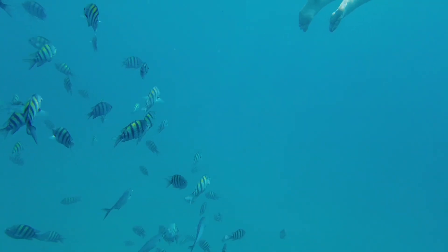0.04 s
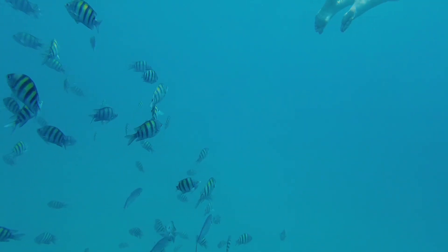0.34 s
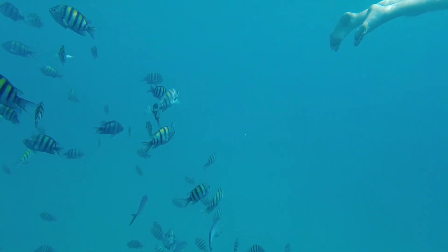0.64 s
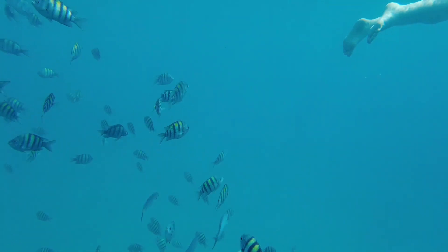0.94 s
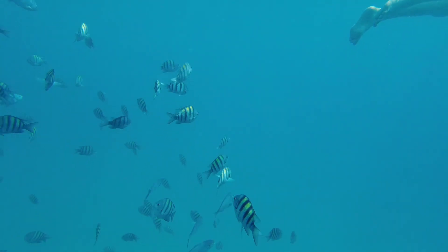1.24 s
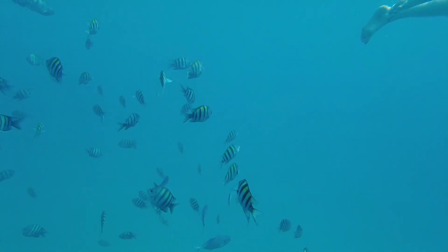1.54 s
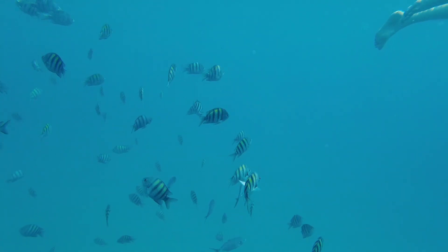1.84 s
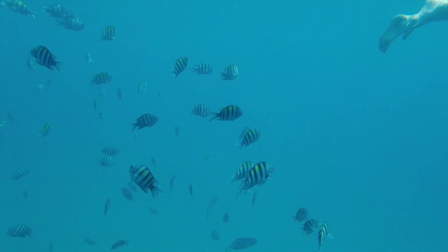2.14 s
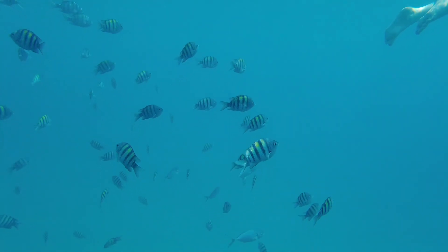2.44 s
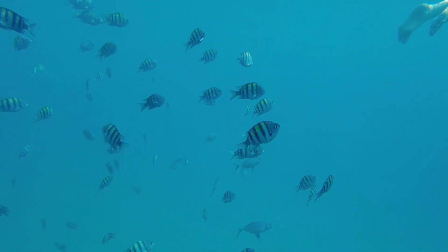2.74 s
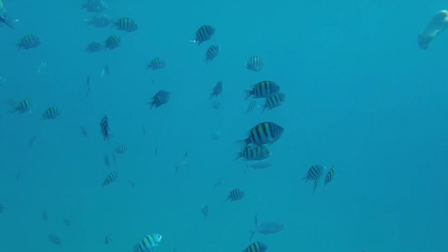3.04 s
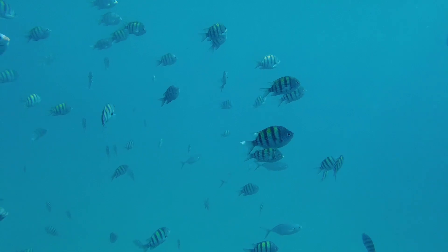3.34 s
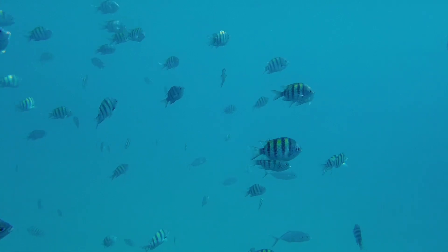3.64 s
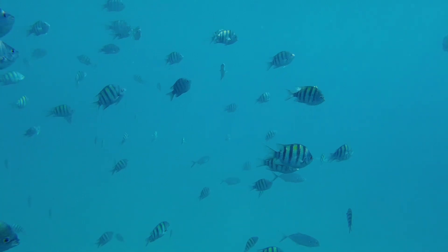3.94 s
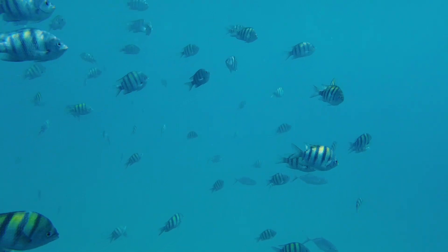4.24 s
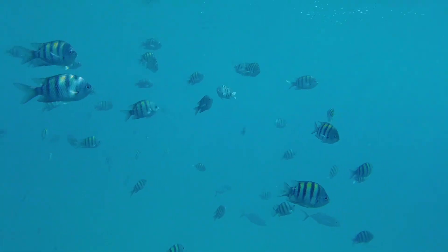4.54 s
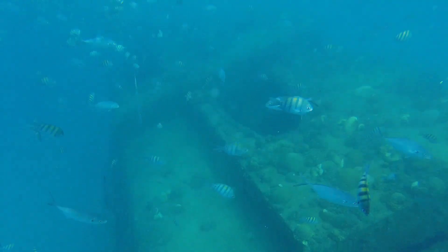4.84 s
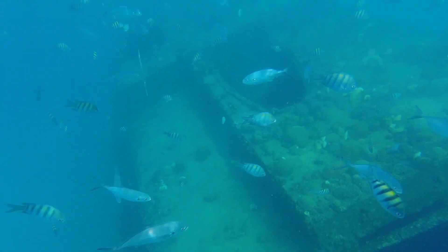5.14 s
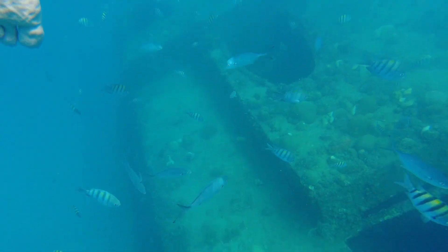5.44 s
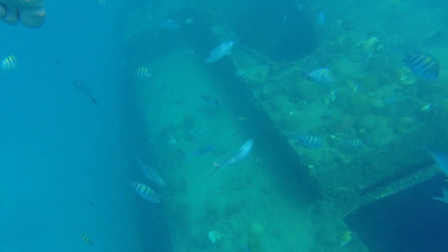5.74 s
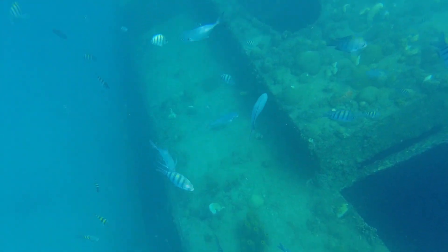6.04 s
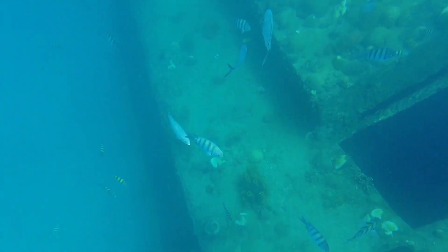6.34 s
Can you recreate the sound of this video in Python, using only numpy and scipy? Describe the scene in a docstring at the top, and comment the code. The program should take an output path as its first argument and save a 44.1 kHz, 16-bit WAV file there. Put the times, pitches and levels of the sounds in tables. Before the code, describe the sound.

From the start, snapping shrimp crackle faintly all around an underwater microphone, near ones as single ticks with a slight ring from the waterproof case, far ones as a frying hiss. Beneath them, water surges in a soft, fluttering rumble and swishes briefly against the case. From about 1.1 seconds come light, dull bumps and a cluster of small bubble blips, with more bubbles between 3.2 and 4 seconds. At 3.5 seconds a hard, muffled thump hits the case, by far the loudest sound, followed by a softer one at 3.8. A few light taps come between 4.4 and 4.7 seconds, and the sound drops out for an instant at 4.8. Then, over a wreck, the hiss is duller, thin dry ticks stand out and higher bubbles blip. The crackle carries on, with a last soft surge of water, until about 6.6 seconds.

```python
"""Drifting over a reef, heard through a ringing waterproof case. From the start snapping shrimp crackle
all around, near ones as single ticks, far ones as a hiss, while water surges and scrapes past. Bubbles
blip and the case takes light bumps from 1.1 s; a hard thump lands at 3.5 s, a softer one at 3.8 s.
After a few taps the sound drops out for an instant at 4.8 s. Then, over a wreck, the hiss loses
treble, thin dry ticks stand out and higher bubbles blip."""
import sys
import numpy as np
from scipy import signal
from scipy.fft import rfft, irfft
from scipy.io import wavfile
from scipy.ndimage import uniform_filter1d

SR = 44100
rng = np.random.default_rng(int(sys.argv[2]) if len(sys.argv) > 2 else 0)


def transcribe(signal):
    """Save signal, clipped to [-1, 1], as a 16-bit WAV file at the path in sys.argv[1]."""
    frames = np.atleast_2d(signal).T
    limited = np.clip(frames, -1, 1)
    pcm = np.round(limited * 32767).astype(np.int16)
    wavfile.write(sys.argv[1], SR, pcm)


N = 290619
TIME = np.arange(N) / SR
SPREAD = np.array([[1], [-1]])  # adds on the left, subtracts on the right

# Foreground shrimp snaps, before trim and pan: start_s, ring_db, treble_db, ring_centre_hz
NEAR_SNAPS = [(0.119, -46.5, -53.5, 3040), (0.1509, -51, -50.5, 2990.0), (0.2204, -47, -47, 2930.0),
              (0.4422, -44.5, -51, 3000), (0.455, -61, -59, 2840.0), (0.4654, -53, -55.0, 3000.0),
              (0.5049, -54, -52.0, 3000.0), (0.5228, -53, -55, 3030.0), (0.6094, -50.5, -51.5, 2940),
              (0.7431, -48, -55.5, 2980), (0.7491, -48, -49, 2940), (0.795, -61.5, -52, 2850.0),
              (0.8873, -46.5, -51, 3030), (0.9185, -47, -47.5, 2980), (0.9575, -50.5, -52, 2880),
              (0.983, -61, -52, 3020.0), (1.0136, -55.5, -58, 3160), (1.041, -55, -50, 3100),
              (1.1544, -59, -49.5, 2960), (1.3114, -55.5, -50.5, 3010.0), (1.332, -55.5, -55, 3120.0),
              (1.442, -54, -47.5, 2980.0), (1.455, -62, -54, 2900.0), (1.517, -44.0, -46, 3170),
              (1.5438, -50.5, -56.5, 3100), (1.6326, -44, -52.5, 3280), (1.7431, -54.5, -62, 2700),
              (1.8088, -56, -54, 2940.0), (1.8227, -48.5, -52, 3000), (1.886, -48, -58, 3030),
              (1.9898, -48.5, -48, 3130), (2.049, -50, -56, 2950.0), (2.076, -47.0, -58, 3040),
              (2.0819, -37.5, -41, 3000), (2.0888, -57, -73, 3000), (2.118, -53.5, -61, 2750),
              (2.1922, -56.0, -51.5, 3180), (2.207, -54.5, -53, 3140.0), (2.22, -53, -57, 3120.0),
              (2.253, -48.5, -48, 3140), (2.2823, -51, -57, 3000), (2.337, -35.5, -48, 2770),
              (2.4734, -50.5, -56.5, 2900.0), (2.6989, -50, -51, 3200), (2.722, -45.5, -49.5, 3000),
              (2.7536, -55, -50.0, 2900), (2.7579, -46, -51, 3260), (2.771, -52, -55, 3130),
              (2.8414, -52.5, -52.5, 2660), (2.886, -62.5, -55.5, 3010.0), (2.9085, -49, -49.5, 3160),
              (2.9986, -40.5, -37.5, 2950.0), (3.0094, -40.5, -51, 3070), (3.0137, -55, -64, 3070),
              (3.0399, -48.5, -51, 3150), (3.0853, -46, -43.5, 3080.0), (3.0896, -52, -43.5, 3130.0),
              (3.204, -70.0, -57, 2990.0), (3.2266, -52, -48, 3080.0), (3.2358, -50, -53.5, 3070),
              (3.2626, -46.5, -52.5, 3130), (3.5518, -54, -52, 3040), (3.583, -56, -55, 3030.0),
              (3.654, -43.5, -49, 3160.0), (3.7, -43.5, -60.0, 2740), (3.781, -58, -50, 2780.0),
              (3.8383, -58, -51, 3080), (3.8476, -44.5, -50, 2700), (3.8862, -51, -54, 3070.0),
              (3.9307, -52, -63, 3120), (3.9367, -48.5, -71, 3230), (4.2043, -48.5, -53, 2950),
              (4.237, -51, -50, 3140.0), (4.2514, -67.0, -49, 2700), (4.349, -55, -47.5, 2910.0),
              (4.357, -53, -55, 2860), (4.4948, -49, -54, 2560), (4.5207, -43.5, -46, 2780),
              (4.544, -51.5, -50, 2900.0), (4.5545, -53, -54, 3060), (4.6282, -68.0, -49.5, 3000.0),
              (4.641, -60, -47.5, 3040.0), (4.6795, -63, -52.5, 2920.0), (4.7137, -44.0, -59.5, 2920),
              (5.048, -41.5, -78, 3030.0), (5.0578, -48, -76, 2800), (5.1476, -50, -60.5, 2930),
              (5.4568, -51, -74.5, 2940), (5.4974, -45.5, -58, 3100.0), (5.5148, -51.0, -57, 2780),
              (5.7956, -51.5, -59, 2940.0), (5.8387, -47.0, -62, 2780), (5.9021, -42.5, -67, 2760),
              (6.0522, -46.5, -63.5, 2980), (6.0835, -53.5, -71.5, 2740), (6.3067, -56.5, -61, 2870)]
# Fader ride for the case ring of the middle and far shrimp: time_s, relative_db
RING_RIDE = [(0, -62.5), (1.0, -64), (2.15, -62.5), (2.52, -66), (3.3, -64), (3.72, -60), (4.24, -68),
             (4.9, -63), (5.35, -66.5), (5.85, -64.5), (6.25, -70), (6.59, -68)]
# Fader ride for their treble, weaker over the wreck: time_s, relative_db
TREBLE_RIDE = [(0, -66), (.9, -64), (1.25, -66), (2.5, -65.5), (3.6, -63.5), (4.15, -65), (4.55, -64.5),
               (4.9, -69), (5.3, -76.5), (5.83, -65), (6.0, -70), (6.59, -71)]
# Thin dry ticks close to the case over the wreck: start_s, peak_db
WRECK_TICKS = [(4.889, -57), (4.902, -43), (5.103, -42), (5.357, -47), (5.519, -55), (5.687, -43),
               (5.781, -47), (5.831, -39), (5.8675, -36), (5.957, -61), (6.156, -49), (6.238, -47),
               (6.325, -55), (6.505, -50)]
# Hits on the case: time_s, push_db, contact_half_width_s, sign (+ presses, - pulls)
CASE_BUMPS = [(1.11, -42, 0.0095, -1), (1.309, -39.5, 0.0072, 1), (2.266, -49, 0.0026, 1),
              (3.511, -7, 0.0012, 1), (3.614, -32.5, 0.0016, -1), (3.786, -19.5, 0.0019, -1),
              (4.411, -37, 0.0031, -1), (4.579, -35.5, 0.00056, 1), (4.597, -36, 0.00031, 1),
              (4.713, -40.5, 0.000069, -1)]
# Close bubble blips: start_s, pitch_hz, peak_db, decay_cycles (to fall by 60 dB)
NEAR_BUBBLES = [(1.158, 624, -57, 24), (1.188, 635, -46.5, 37), (1.228, 550, -53, 55),
                (1.255, 630, -53.5, 18), (1.443, 657, -53.5, 26), (1.465, 1970, -56, 50),
                (1.539, 656, -40, 44), (3.243, 616, -45.5, 57), (3.337, 706, -55, 79),
                (3.472, 750, -54.5, 60), (3.512, 697, -45.5, 29), (3.694, 608, -42, 24),
                (3.719, 554, -46, 20), (3.936, 908, -48.5, 60), (4.056, 640, -55.5, 49),
                (4.984, 529, -56, 38), (5.027, 1580, -52.5, 31), (5.089, 1480, -53, 93),
                (5.404, 1504, -52, 55), (5.405, 2410, -49, 110), (5.408, 928, -52, 83),
                (5.429, 904, -51.5, 85), (5.434, 626, -54, 17), (5.529, 2005, -45, 52),
                (5.796, 1940, -54, 110), (6.009, 1326, -54.5, 50), (6.082, 1604, -58, 89)]
# Clouds of faint bubbles: start_s, length_s, level_db
BUBBLE_CLOUDS = [(1.2, 0.72, -69.5), (2.27, 0.27, -62.5), (3.62, 0.18, -64)]
# Water swishing along the case: start_s, length_s, level_db, low_hz, high_hz
WATER_SCRAPES = [(0.066, 0.11, -66.5, 112, 770), (0.88, 0.31, -72, 161, 288),
                 (1.318, 0.031, -60.5, 1370, 2550), (1.652, 0.064, -61, 167, 1010),
                 (1.666, 0.036, -55.5, 1300, 2800), (1.693, 0.006, -47.5, 304, 3050),
                 (3.462, 0.077, -60.5, 1390, 4480), (3.504, 0.035, -51, 245, 816),
                 (3.533, 0.35, -63.5, 110, 790), (3.847, 0.021, -56.5, 260, 1450),
                 (3.844, 0.0072, -45, 1840, 2860), (4.572, 0.027, -54, 248, 1650),
                 (5.384, 0.077, -60.5, 570, 2960), (5.437, 0.16, -64, 850, 3120),
                 (5.495, 0.018, -57.5, 3300, 6500)]
# Surges of water past the case, before flutter: start_s, length_s, level_db
WATER_SURGES = [(.47, 0.17, -56.5), (.83, 0.5, -56.5), (1.66, 0.16, -64), (2.24, 0.04, -56.5),
                (2.68, 0.54, -60.5), (3.28, 0.59, -54.5), (4.41, 0.15, -50), (4.54, 0.23, -56.5),
                (6.27, 0.28, -57)]
# Tone of the case walls moving together, alike in both channels: frequency_hz, gain_db
CASE_MID_EQ = [(500, -20.5), (1200, -26), (1500, 1), (1780, -11.5), (2000, -8), (2500, 0.5), (2930, 6),
               (3060, 6), (3250, 7), (3600, -17.5), (5350, -1.5), (7000, -11.5), (9300, -9), (10800, -23.5),
               (14600, -10), (16000, -44)]
# Tone of the case walls rocking, opposite in the two channels: frequency_hz, gain_db
CASE_SIDE_EQ = [(300, -24), (1000, -29), (2000, -17), (2850, -18.5), (3150, -2.5), (3500, -14),
                (4500, -4.5), (5400, -16), (6300, 0), (7000, -25), (7500, -4), (8000, -17), (8900, -13),
                (10400, -22), (11100, -10), (12000, -35), (14000, -10.5), (16000, -33)]
# Tone of the water wash, alike in both channels: frequency_hz, gain_db
WASH_MID_EQ = [(30, 6.5), (100, -11.5), (145, 3.5), (175, -9.5), (265, 0.5), (350, -7), (650, -10),
               (800, -12.5), (930, -10.5), (1030, -16), (1250, -14), (1500, -4), (1760, -15), (1990, -5),
               (2200, -11.5), (2700, -10), (3700, -13.5), (5400, -17), (11000, -24.5), (15000, -23.5)]
# Tone of the water wash, opposite in the two channels: frequency_hz, gain_db
WASH_SIDE_EQ = [(30, -35), (110, -34), (145, -13), (280, -17.5), (420, -7.5), (750, -12.5), (940, -4),
                (1100, -9), (1400, -4), (1950, -14), (2150, -12), (2320, -2.5), (2500, -8), (3800, -12),
                (6000, -15.5), (15000, -28)]


def snap(tail_db, paths=10, paths_s=.0021, path_db=-2.0, side_db=-1, tail_s=0.011, size=2048):
    """A shrimp's cavity collapses: a spike, echoes around the case, a tail off surface and seabed."""
    pressure = undb(tail_db) * rng.standard_normal((2, size)) * np.exp(-np.arange(size) / SR / tail_s)
    pressure[:, 0] += 1
    for late, mid, side in rng.random((paths, 3)):
        echo = undb(path_db) * (1 - late / 2) * (2 * np.array([mid, side]) - 1)
        pressure[:, int(late * paths_s * SR)] += echo
    return through_case(pressure[0], rng.choice([-1, 1]) * undb(side_db) * pressure[1], scatter_db=4.5)


def near_shrimp(tail_db=-25, dry_above_db=-48, treble_trim_db=0.5, left_db=1, pan_spread_db=6.0):
    """Single snaps from random directions; the nearest stand clear of their tails."""
    out = np.zeros((2, N))
    attack = int(.005 * SR)  # the first 5 ms set a snap's level
    for (start, ring_db, treble_db, hz), place in zip(NEAR_SNAPS, rng.standard_normal(len(NEAR_SNAPS))):
        nearness_db = max(ring_db - dry_above_db, treble_db - dry_above_db, 0)
        ring, treble = ring_and_treble(snap(tail_db - nearness_db / 2))
        ring = focus_ring(ring, hz)
        treble = band(treble, 11000, "low", order=1)
        ring = undb(ring_db) * ring / rms(ring[:, :attack])
        treble = undb(treble_db + treble_trim_db) * treble / rms(treble[:, :attack])
        pan = undb(SPREAD * (left_db + pan_spread_db * place) / 2)
        add(out, (ring + treble) * pan, start + .0005)
    return out


def middle_shrimp(ring_db, treble_db, count=440, ring_trim_db=9.0, treble_trim_db=15, range_db=4.5,
                  tilt_spread_db=7, pan_spread_db=3.5, ring_hz=2980, ring_spread_hz=420):
    """Snaps from a middle distance poke out of the hiss, most of them weak, each in its own colour."""
    stems = np.zeros((2, 2, N))  # ring and treble, each in stereo
    for slot, (late, near, bright, place, pitch) in enumerate(rng.random((count, 5))):
        ring, treble = ring_and_treble(snap(tail_db=-22))
        ring = focus_ring(ring, ring_hz + ring_spread_hz * (2 * pitch - 1))
        tilt_db = tilt_spread_db * (2 * bright - 1)
        ring = ring / np.abs(ring).max() * undb(-tilt_db / 2)
        treble = treble / np.abs(treble).max() * undb(tilt_db / 2)
        channel_db = range_db * near ** 2 + pan_spread_db * (2 * place - 1) * SPREAD
        start = (slot + 10 * late) % count / count * N / SR  # an even grid, loosened by up to ten slots
        add(stems, np.array([ring, treble]) * undb(channel_db), start)
    return stems[0] * undb(ring_db + ring_trim_db) + stems[1] * undb(treble_db + treble_trim_db)


def far_shrimp(ring_db, treble_db, per_s=2500, scatter_db=5.5, largest_db=18,
               ring_trim_db=-2.0, treble_trim_db=-4.5, smear_s=0.0024):
    """Countless small snaps, each smeared over several paths, merge into a frying hiss."""
    sizes = undb(np.minimum(scatter_db * rng.exponential(size=N), largest_db))
    power = (rng.random(N) < per_s / SR) * sizes ** 2
    smear = np.exp(-1 / (smear_s * SR))
    envelope = np.sqrt(signal.lfilter([1], [1, -smear], power))
    ring, treble = ring_and_treble(through_case(*(envelope * rng.standard_normal((2, N)))))
    return (ring / rms(ring.mean(0)) * undb(ring_db + ring_trim_db)
            + treble / rms(treble.mean(0)) * undb(treble_db + treble_trim_db))


def ticks(count=280, faint_db=-56, scatter_db=3, decay_s=0.00048, low_hz=4800, width=0.47, size=512):
    """Faint dry ticks prickle on the case throughout; over the wreck a few stand out."""
    out, t = np.zeros((2, N)), np.arange(size) / SR
    faint = [(when * N / SR, faint_db + scatter_db * (2 * loud - 1))
             for when, loud in rng.random((count, 2))]
    for start, db in list(WRECK_TICKS) + faint:
        mid, side = band(rng.standard_normal((2, size)) * np.exp(-t / decay_s), low_hz, "high")
        add(out, undb(db) * (mid + width * SPREAD * side) / np.abs(mid).max(), start)
    return out


def bumps(rebound=0.33, rebound_s=0.0118, widen=2.9, body_hz=150, body_db=-30, body_t60_s=0.26,
          pan_db=-1, muffle=0.49, size=16384):
    """A push squeezes the case, which springs back more slowly and hums; longer contact is duller."""
    out, t = np.zeros(N), (np.arange(size) - size // 2) / SR
    after = np.maximum(t, 0)
    hum = undb(body_db) * np.sin(2 * np.pi * body_hz * after) * np.exp(-np.log(1000) * after / body_t60_s)
    for when, db, contact_s, sign in CASE_BUMPS:
        push = 1 / (1 + (t / contact_s) ** 2)
        release = rebound / (1 + ((t - rebound_s) / (widen * contact_s)) ** 2)
        thump = band(push - release + hum, min(muffle / contact_s, SR / 2.5), "low")
        add(out, sign * undb(db) * thump, when + t[0])
    return out * undb(SPREAD * pan_db / 2)


def bubble(hz, t60_s, wobble, rise=0.063, onset_cycles=8.2, size=8192):
    """A bubble rings at its own pitch, which creeps up as it rises; its shape wobbles."""
    t = np.arange(size) / SR
    shake = band(rng.standard_normal((2, size)), 73, "low")
    tremolo, bend = wobble * shake / rms(shake)
    phase = 2 * np.pi * hz * (t + rise * t ** 2 / (2 * t60_s)) + bend
    onset = 1 - np.exp(-(t * hz / onset_cycles) ** 2)
    return onset * np.exp(-np.log(1000) * t / t60_s) * (1 + tremolo) * np.sin(phase)


def near_bubbles(lean_left=0.14, wobble=0.39):
    """Single bubbles blip close to the case."""
    out = np.zeros((2, N))
    for start, hz, db, cycles in NEAR_BUBBLES:
        blip = bubble(hz, cycles / hz, wobble)
        add(out, undb(db) * blip / np.abs(blip).max() * (1 + lean_left * SPREAD), start)
    return out


def bubble_clouds(count=480, centre_hz=610, octaves=.3, t60_s=0.11, scatter_db=2.5, width=0.53):
    """Faint bubbles further off, of mixed sizes and from all sides, blur into passing burbles."""
    out = np.zeros((2, N))
    for start, (pitch, loud, place) in zip(rng.random(count) * N / SR, rng.standard_normal((count, 3))):
        blip = bubble(centre_hz * 2 ** (octaves * pitch), t60_s, wobble=0.21)
        add(out, undb(scatter_db * loud) * blip * (1 + width * place * SPREAD), start)
    return out / rms(out) * swells(BUBBLE_CLOUDS, rest_db=-74, attack_s=0.025, release_s=0.26)


def scrapes(grain_db=2, width=0.54):
    """Water rubs the case in short, grainy swishes, coloured by its low resonances."""
    out = np.zeros((2, N))
    grain = rng.standard_normal((2, N)) * undb(grain_db * wander(rate_hz=140))
    rub = np.array([colour(channel, WASH_MID_EQ) for channel in grain])
    for start, length_s, db, low_hz, high_hz in WATER_SCRAPES:
        i, n = int(start * SR), int(length_s * SR)
        mid, side = band(rub, [low_hz, high_hz], "band", order=3)[:, i:i + n] * signal.windows.tukey(n)
        add(out, undb(db) * (mid + width * SPREAD * side) / rms(mid), start)
    return out


def slosh(corner_hz=36, flutter_db=5.0, eddy_db=-14, eddy_hz=110, width=0.057, stir_db=-30, stir_s=0.067):
    """Water pushing past, in surges and around each bump, makes a fluttering sub rumble with eddies."""
    mid, side = band(band(rng.standard_normal((2, N)), corner_hz, "low", order=4), 16, "high")
    mid = mid / np.sqrt(uniform_filter1d(mid ** 2, size=4096))  # levelled, so the surges give the shape
    eddies = band(rng.standard_normal(N), eddy_hz, "low")
    rumble = mid + undb(eddy_db) * eddies / rms(eddies) + width * SPREAD * side / rms(side)
    surges = swells(WATER_SURGES, rest_db=-65.5, attack_s=0.012, release_s=0.032)
    stir = sum(undb(db + stir_db) * np.exp(-np.abs(TIME - when) / stir_s)
               for when, db, _, _ in CASE_BUMPS)
    return rumble * (surges + stir) * undb(flutter_db * wander(rate_hz=24.98))


def wash(level_db=-63.5):
    """The dull bed of open water, coloured by the low resonances of the case."""
    mid, side = (colour(rng.standard_normal(N), eq) * undb(wander(rate_hz=22.27))
                 for eq in (WASH_MID_EQ, WASH_SIDE_EQ))
    return undb(level_db) * (mid + SPREAD * side) / rms(mid)


def through_case(mid, side, scatter_db=0):
    """Two families of wall resonances make the stereo; the angle of arrival favours some over others."""
    mid_eq, side_eq = (eq + scatter_db * rng.standard_normal((len(eq), 1)) * [0, 1]  # gains only
                       for eq in (CASE_MID_EQ, CASE_SIDE_EQ))
    return colour(mid, mid_eq) + SPREAD * colour(side, side_eq)


def ring_and_treble(x, split_hz=3900):
    """Split the main ring of the case from the tick above it."""
    return band(x, split_hz, "low", order=6), band(x, split_hz, "high", order=6)


def focus_ring(ring, hz, span=1.08, rest_db=-11):
    """Each direction of arrival brings out another part of the ring."""
    return band(ring, [hz / span, hz * span], "band", order=1) + undb(rest_db) * ring


def colour(x, eq, size=4096):
    """Minimum-phase EQ: its peaks ring on after each click."""
    hz, db = np.transpose(eq)
    log_gain = np.log(undb(np.interp(np.log(np.fft.rfftfreq(size, 1 / SR) + 1), np.log(hz), db)))
    cepstrum = irfft(log_gain)[:size // 2]
    cepstrum[1:] *= 2
    impulse = irfft(np.exp(rfft(cepstrum, size)))[:size // 2]
    return signal.fftconvolve(x, impulse)[:len(x)]


def swells(table, rest_db, attack_s, release_s):
    """Gain envelope: each row rises, holds and dies away above a resting level."""
    power = undb(rest_db) ** 2
    for start, length_s, db in table:
        fade = np.maximum(start - TIME, 0) / attack_s + np.maximum(TIME - start - length_s, 0) / release_s
        power = power + (undb(db) * np.exp(-fade)) ** 2
    return np.sqrt(power)


def wander(rate_hz):
    """Smoothed random sample-and-hold with an rms of 1."""
    hold = int(SR / rate_hz)
    steps = np.repeat(rng.standard_normal(N // hold + 1), hold)
    smooth = uniform_filter1d(uniform_filter1d(steps, hold), hold)[:N]
    return smooth / rms(smooth)


def band(x, hz, kind, order=2):
    """Butterworth filter."""
    return signal.sosfilt(signal.butter(order, hz, kind, fs=SR, output="sos"), x)


def add(out, x, start_s):
    """Mix a sound into out at start_s."""
    i = max(int(start_s * SR), 0)
    out[..., i:i + x.shape[-1]] += x[..., :N - i]


def undb(db):
    """Decibels to gain."""
    return 10 ** (np.asarray(db) / 20)


def rms(x):
    """Root mean square."""
    return np.sqrt(np.mean(x ** 2))


def scene():
    """Shrimp at three distances, bubbles, moving water and bumps."""
    ring_db, treble_db = (np.interp(TIME, *np.transpose(ride)) for ride in (RING_RIDE, TREBLE_RIDE))
    shrimp = near_shrimp() + ticks() + middle_shrimp(ring_db, treble_db) + far_shrimp(ring_db, treble_db)
    water = near_bubbles() + bubble_clouds() + scrapes() + slosh() + wash()
    return shrimp + water + bumps()


def record(dry):
    """The sound drops out for an instant; a steep low-pass takes off the very top."""
    gap_start_s, gap_end_s, gap_db, top_hz = 4.798, 4.820, -24, 15700
    gap = uniform_filter1d(1. * ((TIME > gap_start_s) & (TIME < gap_end_s)), size=64)
    low_pass = signal.ellip(10, .2, 80, top_hz, fs=SR, output="sos")
    return signal.sosfilt(low_pass, dry * undb(gap_db * gap))


dry = scene()
out = record(dry)
transcribe(out)
```